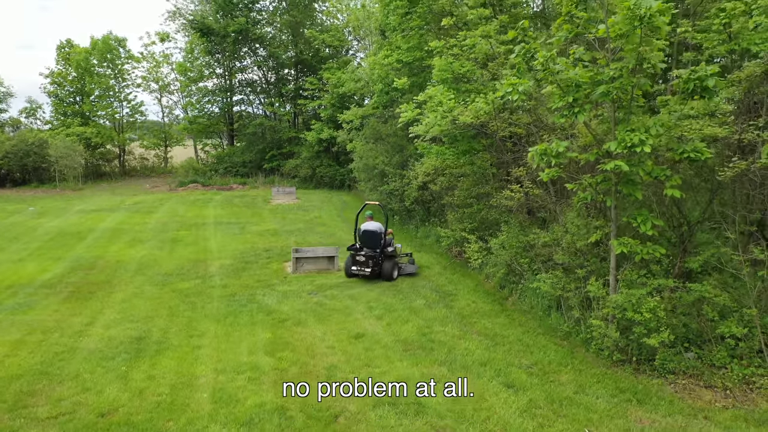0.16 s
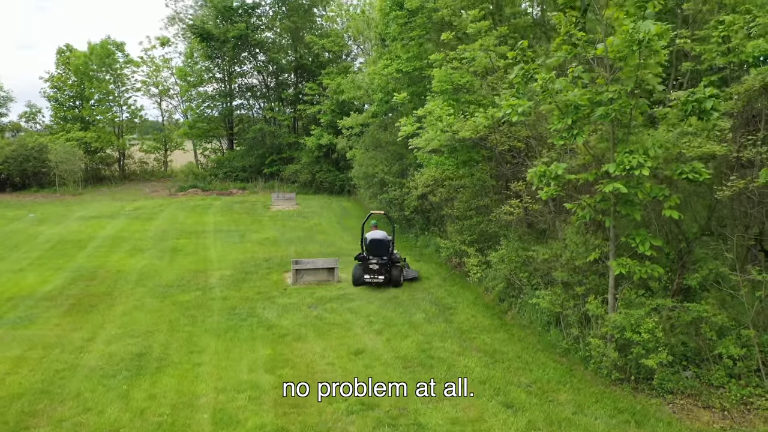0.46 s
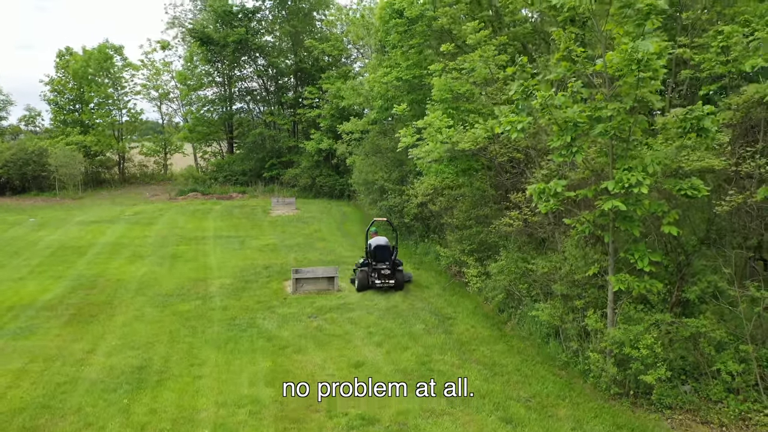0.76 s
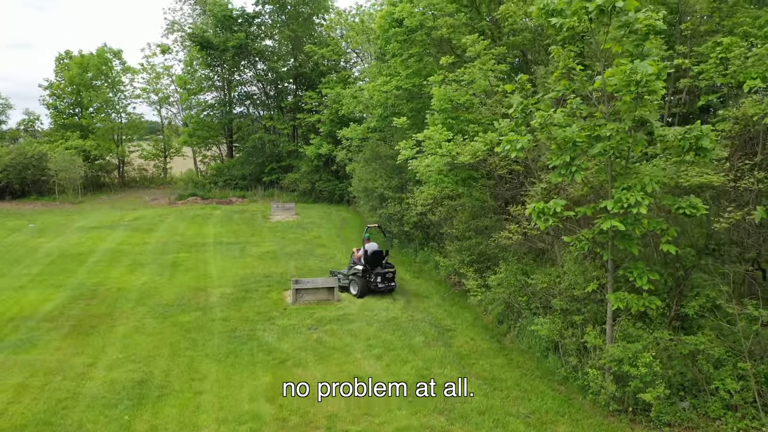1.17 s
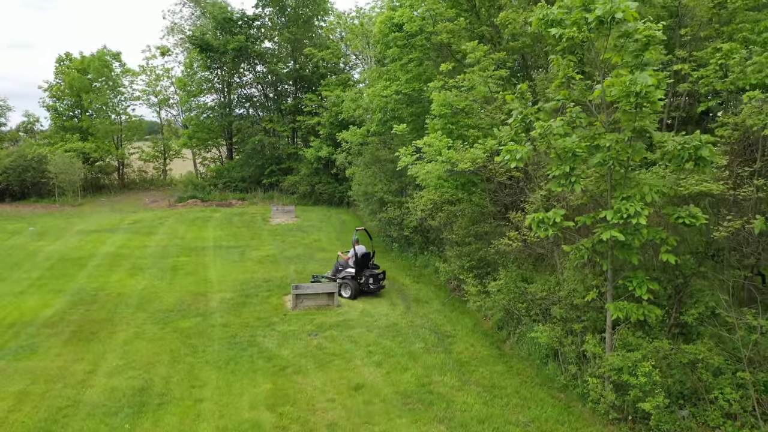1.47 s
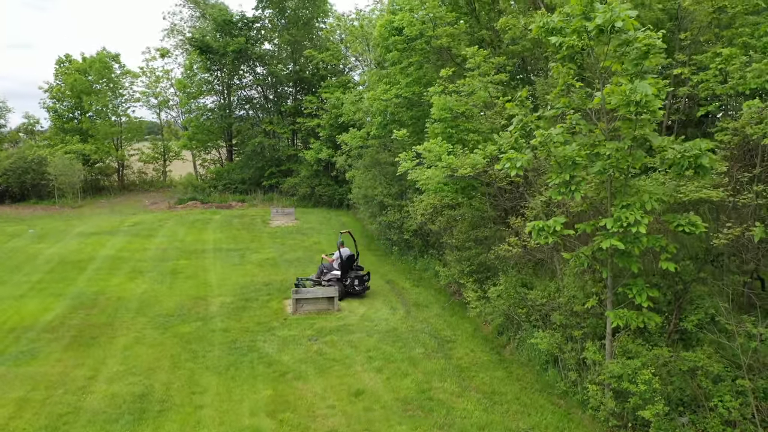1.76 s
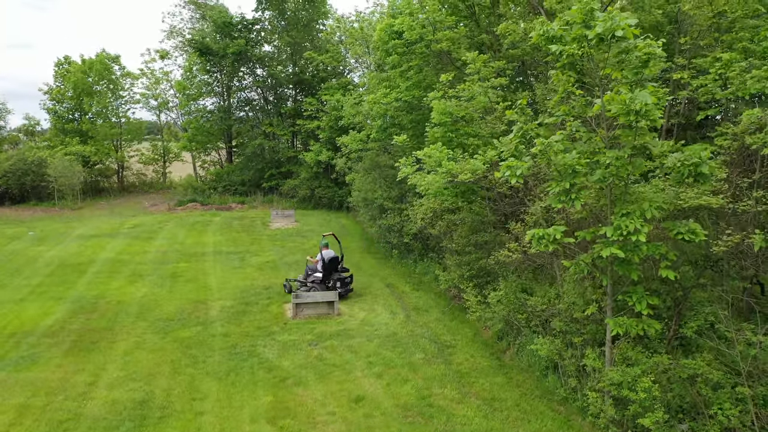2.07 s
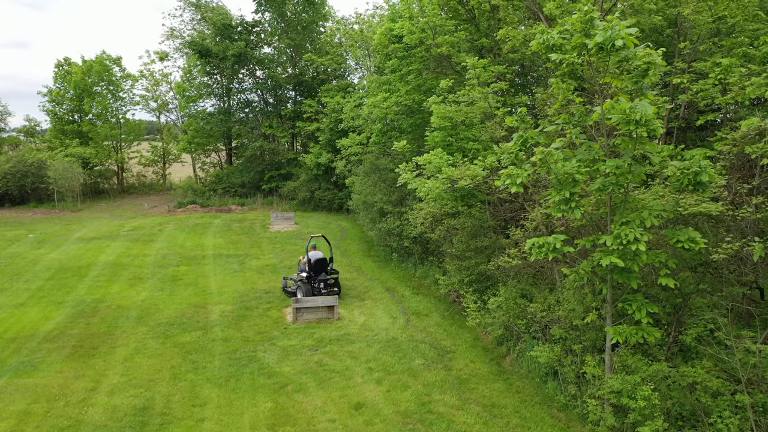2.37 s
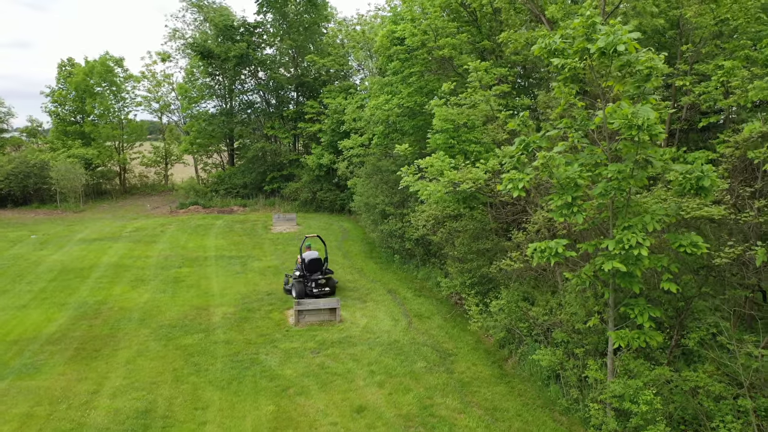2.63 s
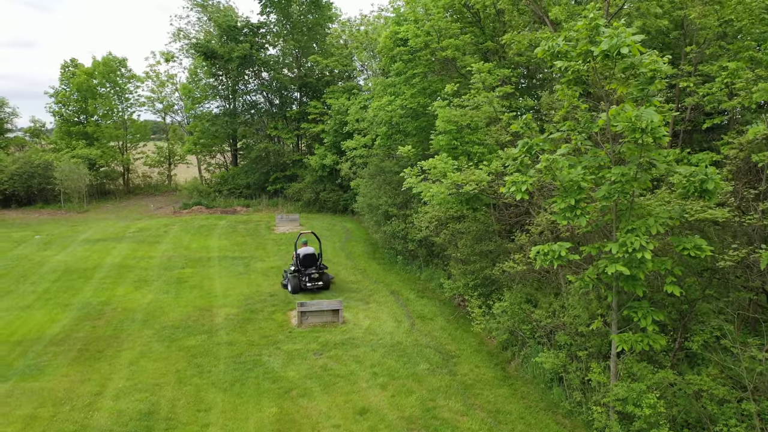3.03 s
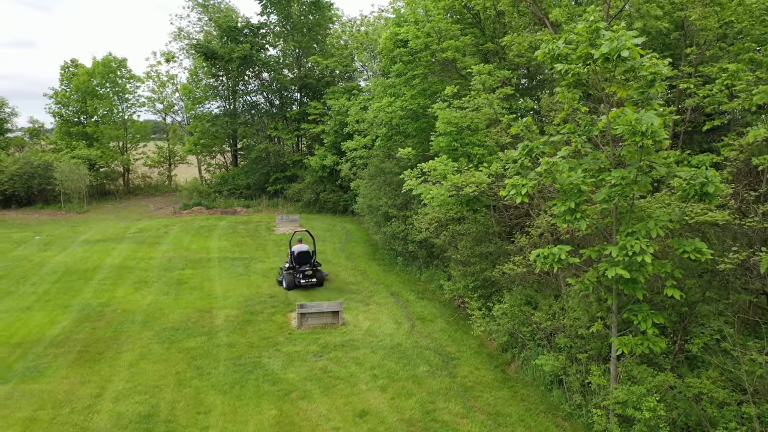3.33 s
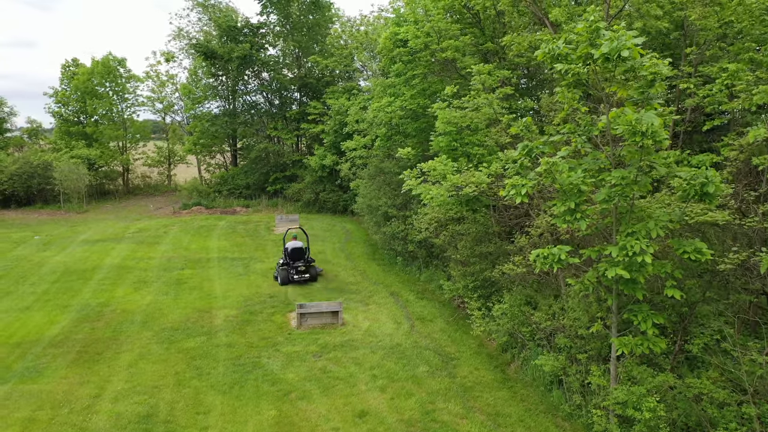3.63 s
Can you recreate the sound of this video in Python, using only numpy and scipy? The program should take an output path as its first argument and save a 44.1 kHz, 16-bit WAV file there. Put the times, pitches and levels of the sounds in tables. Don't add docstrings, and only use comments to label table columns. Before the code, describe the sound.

A petrol ride-on mower drones and roars close by, its sound cutting out once briefly.

```python
import sys
import numpy as np
from scipy import signal
from scipy.io import wavfile
from scipy.ndimage import uniform_filter1d

SR = 44100
rng = np.random.default_rng(int(sys.argv[2]) if len(sys.argv) > 2 else 0)


def persist_wave(psi):
    counts = np.round(np.clip(psi, -1, 1) * 32767).astype(np.int16)
    wavfile.write(sys.argv[1], SR, np.atleast_2d(counts).T)


def elevation(decibels):
    levels = np.asarray(decibels, float)
    return 10 ** (levels / 20)


N = 167580
T = np.arange(N) / SR


def evened(x):
    return x / np.sqrt(np.mean(abs(x) ** 2) + 1e-20)


def read(points, hz):
    f, value = np.transpose(points)
    return np.interp(np.log(hz + 1), np.log(f + 1), value)


def drift(hz):
    size = 4096
    f = np.fft.fftfreq(size, N / SR / size)
    noise = rng.standard_normal(size) + 1j * rng.standard_normal(size)
    z = evened(np.fft.ifft(noise / (1 + (f / hz) ** 4)))
    at, knots = np.linspace(0, size - 1, N), np.arange(size)
    return np.interp(at, knots, z.real) + 1j * np.interp(at, knots, z.imag)


def control(name, t=T):
    # t/s, blade hum/dB, grass load/dB, imbalance/dB, deck octave/dB, exhaust facing/dB, chute howl/dB
    drive = [(0, -11, -26, -34, -26.5, 4, -31.5), (.32, -10.5, -26, -32, -23.5, 1.5, -26.5),
             (.6, -15, -24, -29, -22, 3, -27), (.9, -14, -25, -29.5, -25, 4.5, -26.5),
             (1.15, -16, -22.5, -27, -35, 6, -19.5), (1.42, -14.5, -24, -40, -25, 5, -28.5),
             (1.62, -13, -25.5, -22.5, -20, 3, -32.5), (1.9, -13, -25, -22.5, -19.5, -1, -41),
             (2.25, -12.5, -25, -20, -26, -0.5, -33), (2.6, -14, -25.5, -20, -32.5, -3, -38),
             (2.92, -13, -25, -17.5, -22, -2.5, -27), (3.2, -15.5, -24.5, -17.5, -22.5, -3, -33),
             (3.5, -19, -25, -20, -20.5, -0.5, -24.5), (3.7, -23.5, -24.5, -22, -19, 2, -28),
             (3.8, -20, -23.5, -16, -24, -3, -26)]
    names = ["t", "hum", "load", "imbalance", "octave", "facing", "howl"]
    rows = np.array(drive)
    return np.interp(t, rows[:, 0], rows[:, names.index(name)])


def load(t=T):
    return control("load", t) - control("load").mean()


def shaft():
    # t/s, rate/(turns/s)
    speed = [(0, 66.6), (.9, 66.75), (1.2, 66.4), (1.45, 66), (1.75, 66.5), (2.3, 66.4), (3.2, 66.6),
             (3.5, 66.3), (3.8, 66.4)]
    return 2 * np.pi * np.cumsum(np.interp(T, *np.transpose(speed))) / SR


def cycle():
    belt_ratio = .4312
    return belt_ratio * shaft()


def whines():
    # f/Hz, rms level/dB
    tones = [(2842, -49.5), (4716, -64.5), (5028, -67), (5356, -75.5), (9695, -75), (11160, -78),
             (12350, -81), (13824, -78)]
    width_hz, sway_db = 21, 2
    out = np.zeros(N)
    for hz, db in tones:
        level_db = db + load() + sway_db * np.sqrt(2) * drift(6.).real
        out += elevation(level_db) * (drift(width_hz) * np.exp(2j * np.pi * hz * T)).real
    return out


def chirps():
    # start/s, length/s, f/Hz, level/dB
    squeaks = [
        (0, .5, 12350, -69),
        (.38, .06, 8750, -61),
        (1.1, .4, 13824, -67),
        (1.3, .4, 11160, -66),
        (1.65, .35, 13824, -69),
        (2.97, .04, 13824, -66),
        (3.38, .1, 13824, -65),
        (3.46, .08, 6250, -57),
        (3.6, .06, 6250, -56),
        (3.72, .08, 12350, -62),
    ]
    out = np.zeros(N)
    for start_s, length_s, hz, db in squeaks:
        swell = np.sin(np.pi * np.clip((T - start_s) / length_s, 0, 1)) ** .5
        tone = ((1 + .6 * drift(30.)) * np.exp(2j * np.pi * hz * T)).real
        out += elevation(db) * np.sqrt(2) * swell * tone
    return out


def clippings():
    rate_per_s, level_db, spread_db = 1500, -42, 2.2
    size = elevation(spread_db * np.minimum(rng.exponential(1, N), 5)) * (rng.random(N) < rate_per_s / SR)
    spot, t, out = rng.integers(0, 16, N), np.arange(300) / SR, np.zeros(N)
    for k, hz in enumerate(np.geomspace(900, 6000, 16)):
        ring = np.sin(2 * np.pi * hz * t) * t * hz * np.exp(-t * hz / 1.8) * 1200 / hz ** 0.7
        out += signal.oaconvolve(size * (spot == k), ring)[:N]
    return elevation(level_db + 0.82 * load()) * evened(out)


def roar():
    # f/Hz, density/dB
    spectrum = [(25, -14.5), (100, -25), (160, -6), (350, -7), (1000, -12), (2200, -22), (5000, -35.5),
                (15500, -51)]
    # f/Hz, width/Hz, level/dB
    hollows = [(310, 120, 0), (870, 97, 1.5), (1874, 180, 3), (4200, 490, 1)]
    # f/Hz, share/1
    load_share = [(100, .3), (350, 0.91), (1000, 1.14), (4000, 2.46), (12000, 1.8)]
    # f/Hz, share/1
    facing_share = [(60, .6), (300, 0.51), (2000, -0.25), (6000, -0.13), (13000, 0.29)]
    level_db, patch_db, streak_db, gust_db = -20, 0.5, 2.2, 0.31
    blade_depth, fire_depth = 0.07, 0.069

    def smooth(x, frames_wide, bins_wide):
        x = uniform_filter1d(x, size=frames_wide, axis=0)
        return evened(uniform_filter1d(x, size=bins_wide, axis=1))

    frames, hz = N // 256 + 5, np.fft.rfftfreq(1024, 1 / SR)
    frame_s = np.arange(frames) * 256 / SR
    a, b, patches, streaks = rng.standard_normal((frames, 513, 4)).T
    patches, streaks = smooth(patches, 14, 12), smooth(streaks, 2, 10)
    gust = evened(uniform_filter1d(rng.standard_normal(frames), size=6))
    shape = read(spectrum, hz) + sum(db * np.exp(-((hz - f) / w) ** 2) for f, w, db in hollows)
    field_db = shape[:, None] + patch_db * patches + streak_db * streaks
    field_db = field_db + read(load_share, hz)[:, None] * (load(frame_s) + gust_db * gust)
    field_db = field_db + read(facing_share, hz)[:, None] * control("facing", frame_s)
    air = evened(signal.istft((a + 1j * b) * elevation(field_db), nperseg=1024, noverlap=768)[1][:N])
    s = shaft()
    chop = blade_depth * (np.cos(2 * s) + 0.75 * np.cos(s) + 0.56 * np.cos(4 * s))
    return elevation(level_db) * air * (1 + chop + fire_depth * np.cos(cycle()))


def engine():
    # multiple of cycle/1, level/dB
    firing = [(2, -32), (3, -34.5), (4, -47), (5, -33.5), (6, -31.5), (8, -36.5), (10, -31.5), (11, -32.5),
              (13, -34), (14, -40.5), (22, -47.5)]
    angle, out = cycle(), np.zeros(N)
    for k, db in firing:
        waver = 1 + .2 * drift(2.0)
        phase = 2 * np.pi * rng.random()
        out += np.sqrt(2) * elevation(db) * (waver * np.exp(1j * (k * angle + phase))).real
    return elevation(control("facing")) * out


def order(k, level_db, wobble):
    # t/s, octave lag/turns
    swing = [
        (0, .21),
        (2, .2),
        (2.5, .38),
        (2.95, .6),
        (3.8, .62),
    ]
    odd_lag_turns, wobble_hz, shake_per_load = .51, 10, 2.3
    shake = 1 + wobble * elevation(shake_per_load * load()) * drift(wobble_hz)
    swing_turns = np.interp(T, *np.transpose(swing)) * k / 4 * (k % 2 == 0) * (k > 2)
    lag = 2 * np.pi * (odd_lag_turns * (k % 2 == 1) + swing_turns)
    return np.sqrt(2) * elevation(level_db) * (shake * np.exp(1j * (k * shaft() + lag))).real


def blades():
    # shaft order/1, level/dB, share following load/1
    upper = [(5, -30.5, 1.3), (6, -32, 2.4), (7, -34.5, 0.28), (9, -38.5, 0.87), (9.5, -39, 0.54),
             (10, -49.5, .5), (12, -36.5, 0.3), (14, -38, .8)]
    out = np.zeros(N)
    for k, name in ((2, "hum"), (3, "imbalance"), (4, "octave"), (8, "howl")):
        out += order(k, control(name), .07 * k / 2)
    for k, db, share in upper:
        out += order(k, db + share * load(), wobble=.35)
    return out


def scene():
    return (whines() + chirps() + clippings() + roar() + engine() + blades())[None]


def top_cut(x):
    return signal.sosfilt(signal.butter(12, 15670, fs=SR, output="sos"), x)


def record(dry):
    # t/s, depth/1, length/s, thump level/dB
    stumbles = [
        (2.049, 0.63, 0.0081, -16),
        (2.297, 0.4, 0.0086, -20),
        (2.576, 0, 0.015, -18),
        (3.262, 0.32, 0.017, -30),
    ]
    thump_hz, cut_s, back_s, fade_s = 82, 2.6268, 2.9088, 0.0021
    x = dry[0].copy()
    for at_s, depth, length_s, db in stumbles:
        bump = np.exp(-((T - at_s) / length_s) ** 2)
        thump = elevation(db) * bump * np.sin(2 * np.pi * thump_hz * (T - at_s))
        x = x * (1 - np.clip(depth, 0, 1) * bump) + thump
    x = np.tanh(1.086 * x) / 1.095
    x = x * np.clip(np.maximum(cut_s - T, (T - back_s) / 1.2) / fade_s, 0, 1)
    x = signal.sosfilt(signal.butter(3, 84.5, "high", fs=SR, output="sos"), x)
    x = signal.sosfilt(signal.butter(4, 14800, fs=SR, output="sos"), x)
    x = x + elevation(-95.5) * rng.standard_normal(N)
    return top_cut(x[None])


dry = scene()
out = record(dry)
persist_wave(out)
```